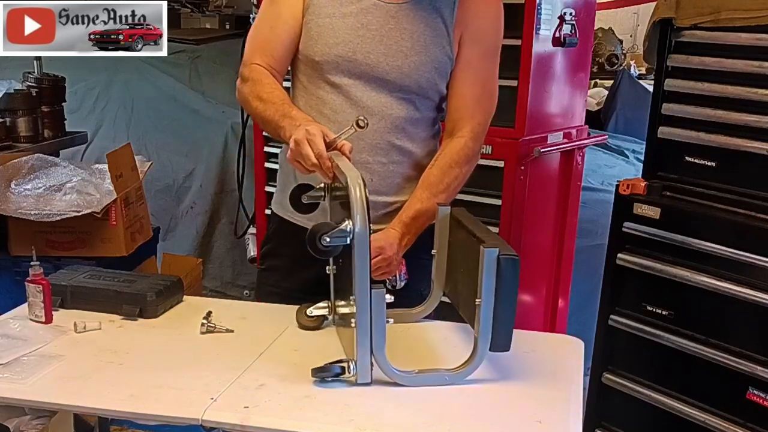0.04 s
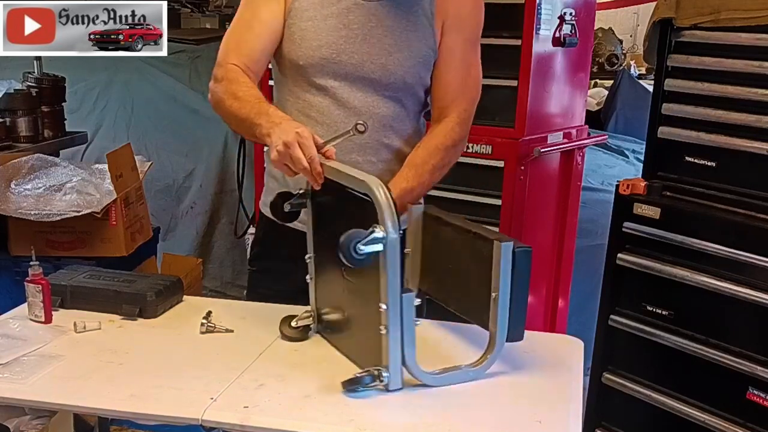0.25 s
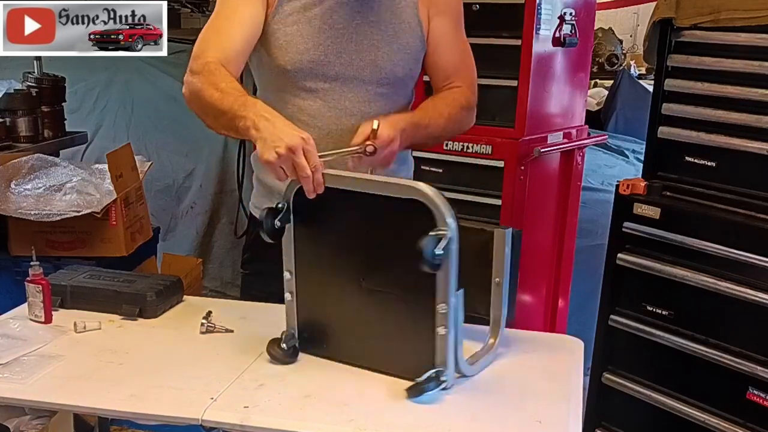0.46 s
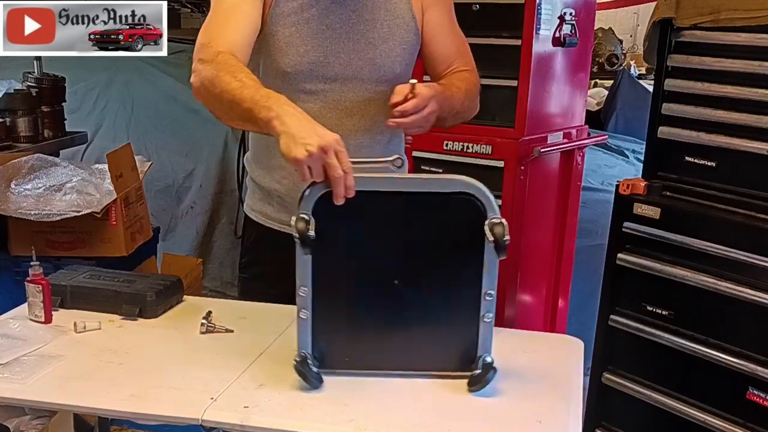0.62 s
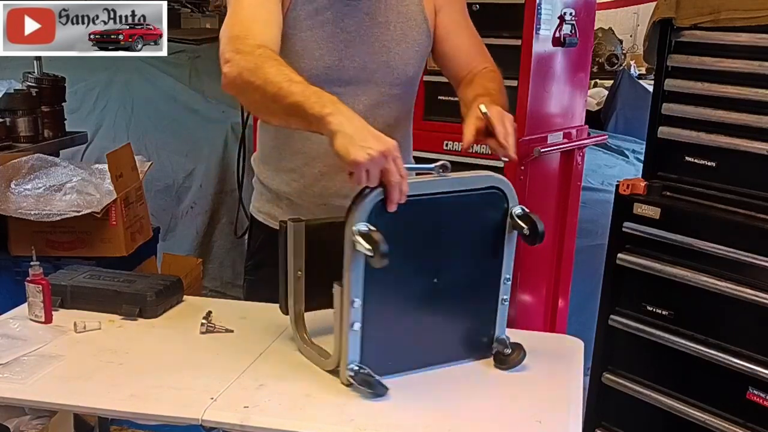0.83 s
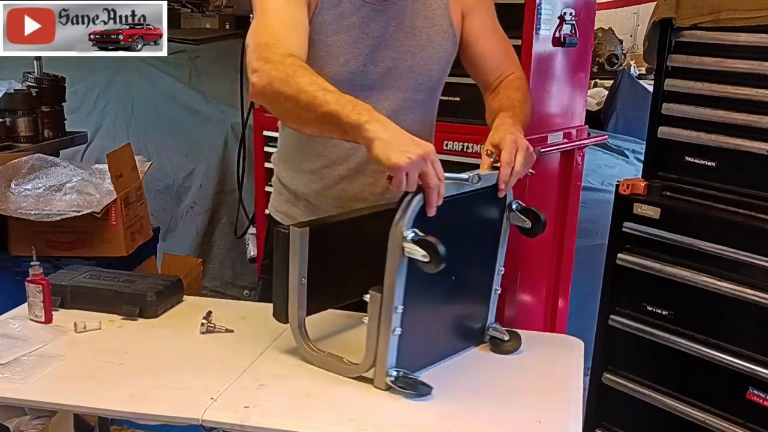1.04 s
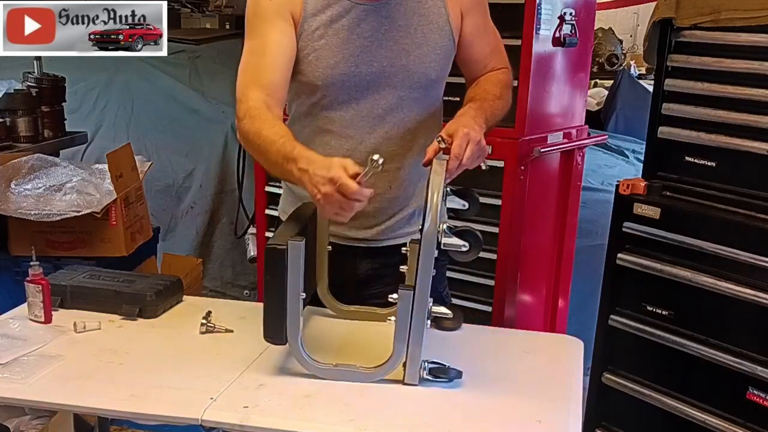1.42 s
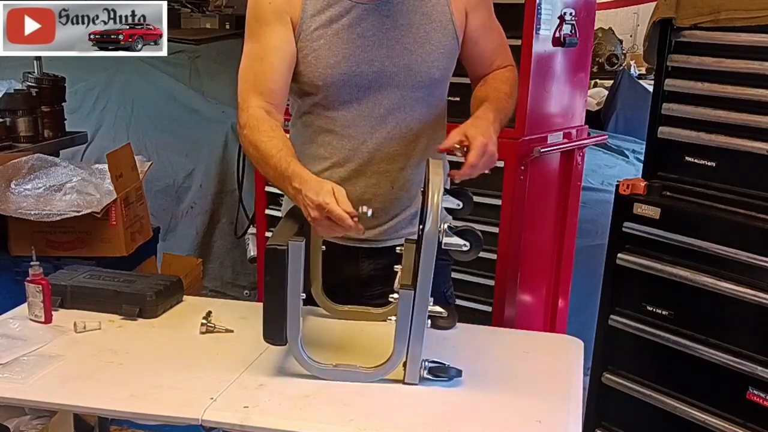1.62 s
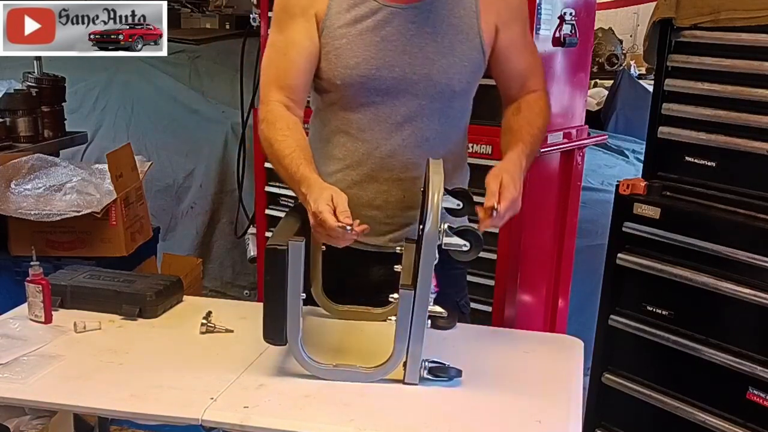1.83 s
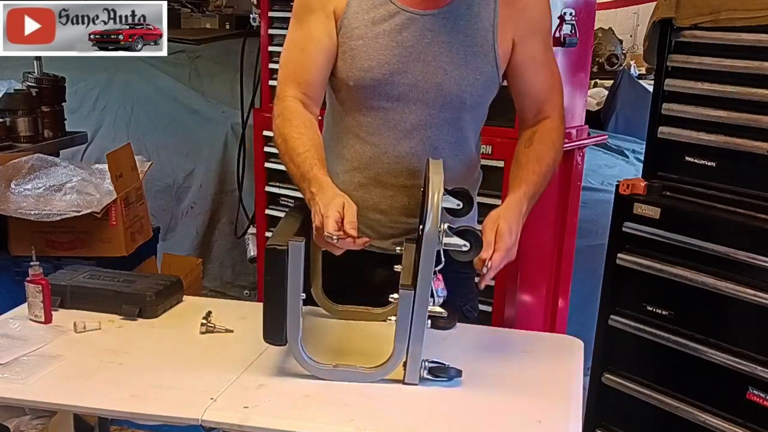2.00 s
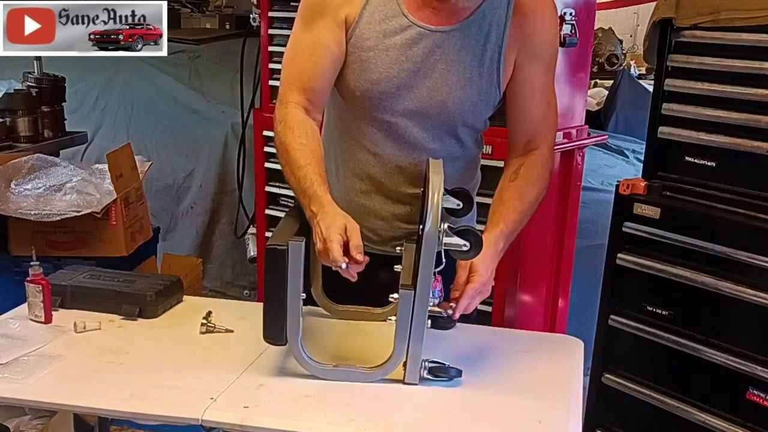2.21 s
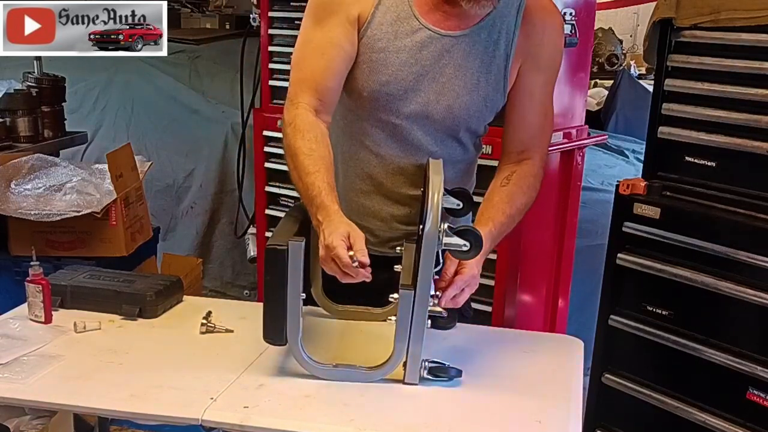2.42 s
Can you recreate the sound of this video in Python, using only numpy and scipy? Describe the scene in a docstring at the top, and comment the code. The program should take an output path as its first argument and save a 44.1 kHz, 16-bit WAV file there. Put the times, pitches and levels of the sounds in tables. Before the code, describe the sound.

A steel stool scrapes round on a workbench in a quiet garage, groaning and squealing as it sticks and slips. It bumps, knocks once and a wrench clinks against it. Light ticks and a small metal click follow.

```python
"""A steel-framed stool lying on its side is dragged round on a workbench in a quiet garage.
The frame sticks and slips, so its tubes and panels drone, groan and squeal while grit rasps under it.
It bumps down and knocks once, and a wrench in the hand clinks on the tube.
After the turn come light ticks, a faint squeak and a last metal click."""
import sys
import numpy as np
from scipy import signal
from scipy.fft import rfft, irfft
from scipy.io import wavfile
from scipy.ndimage import uniform_filter1d

SR = 44100
rng = np.random.default_rng(int(sys.argv[2]) if len(sys.argv) > 2 else 0)


def unload_audio(sound):
    """Save the sound as a 16-bit wav file, at the path given as the first command line argument."""
    columns = np.transpose(np.atleast_2d(sound))
    # keep every value between -1 and 1, then stretch to whole-number steps
    steps = np.round(np.clip(columns, -1, 1) * 32767)
    wavfile.write(sys.argv[1], SR, steps.astype(np.int16))


N = 112454
TIME = np.arange(N) / SR

# Levels in all tables are relative. A fade_s is the time a sound takes to fall by 60 dB.
# Notes the steel tubes ring with: pitch_hz, level_db, fade_s
TUBE_NOTES = [(2476, 6.5, 0.33), (2930, 12.5, 0.038), (3206, -1.5, 0.051), (3180, 0, 0.058),
              (4170, -14.5, .25)]
# Notes the frame rings with when knocked: pitch_hz, level_db, fade_s
KNOCK_NOTES = [(1033, -11, .05), (1338, 4.5, 0.038), (1640, -9, 0.06), (1846, -4, 0.17), (2190, 0, .08),
               (2815, -4, .08), (3670, -5.5, 0.094)]
# Tone of the frame rasping or clacking on the bench: pitch_hz, level_db
RASP_TONE = [(200, -22.5), (500, 1.5), (700, 1), (900, -0.5), (1700, 0), (2200, 0.5), (2600, -5),
             (3500, -33)]


def from_db(db):
    """Turn decibels into a gain."""
    return 10 ** (np.asarray(db) / 20)


def level_one(x):
    """Scale a sound to an average (RMS) level of one."""
    return x / np.sqrt(np.mean(x ** 2) + 1e-20)


def steady(x, span_s=0.037):
    """Hold the running level at one, keeping the fine grain."""
    power = uniform_filter1d(np.mean(x ** 2, axis=0), int(span_s * SR))
    return x / np.sqrt(np.abs(power) + 1e-12)


def gains(rows):
    """Turn each level column of a table into a gain for every sample."""
    time_s, *columns = np.transpose(rows)
    return [from_db(np.interp(TIME, time_s, level_db)) for level_db in columns]


def fade(t, fade_s):
    """Die away by 60 dB every fade_s seconds."""
    return np.exp(-np.log(1000) * t / fade_s)


def convolve(x, response):
    """Let every sample of x set off its own copy of the response."""
    return signal.fftconvolve(np.atleast_2d(x), np.atleast_2d(response), axes=1)[:, :N]


def shape_tone(x, tone, amount=1):
    """Filter a sound to follow a table of pitch_hz, level_db; amount scales the decibels."""
    size = 8192
    pitch_hz, level_db = np.transpose(tone)
    grid_hz = np.maximum(np.fft.rfftfreq(size, 1 / SR), 1)
    curve_db = amount * np.interp(np.log(grid_hz), np.log(pitch_hz), level_db)
    cepstrum = irfft(np.log(from_db(curve_db)))
    # Fold it in half so the filter never sounds before its input.
    cepstrum[1:size // 2] *= 2
    cepstrum[size // 2 + 1:] = 0
    return convolve(x, irfft(np.exp(rfft(cepstrum))))


def ringing(notes):
    """A struck body rings as fading sine waves, here with alternating signs."""
    t = TIME[:SR // 2]
    return sum((-1) ** k * from_db(level_db) * fade(t, fade_s) * np.sin(2 * np.pi * pitch_hz * t)
               for k, (pitch_hz, level_db, fade_s) in enumerate(notes))


def garage(x, wet_db):
    """Add a short echo at wet_db, alike on both sides in the bass and dying sooner in the treble."""
    wide_above_hz, treble_hz, build_s = 704, 4000, 0.0033
    t = TIME[:SR // 2]
    mid, side = rng.standard_normal((2, len(t)))
    side = signal.sosfilt(signal.butter(1, wide_above_hz, "high", fs=SR, output="sos"), side)
    echo = np.array([mid + side, mid - side]) * (1 - np.exp(-t / build_s))
    low = signal.sosfilt(signal.butter(2, treble_hz, fs=SR, output="sos"), echo)
    echo = low * fade(t, fade_s=0.29) + (echo - low) * fade(t, fade_s=0.22)
    return x + from_db(wet_db) * convolve(x, level_one(echo) / np.sqrt(len(t)))


def blows(rows):
    """One sharp push for each row of start_s, level_db."""
    out = np.zeros(N)
    for start_s, level_db in rows:
        out[int(start_s * SR)] += from_db(level_db)
    return out


def unit_hit(x):
    """Scale a hit to the energy of ten milliseconds at level one."""
    return x * np.sqrt(.01 * SR / np.sum(x ** 2))


def crack(tone, fade_s, snap_db):
    """A sharp snap of contact, then a quickly dying burst of noise."""
    t = TIME[:SR // 4]
    burst = rng.standard_normal(len(t)) * fade(t, fade_s)
    burst[0] = from_db(snap_db) * np.linalg.norm(burst)
    return unit_hit(shape_tone(burst, tone))


def strike(rows, tone, notes, crack_s, snap_db, ring_db, wet_db, pan_db):
    """Each contact cracks and sets a body ringing in the room; positive pan_db leans left."""
    hits = blows(rows)
    cracks = convolve(hits, crack(tone, crack_s, snap_db))
    ring = from_db(ring_db) * convolve(hits, unit_hit(ringing(notes)))
    return garage(cracks + ring, wet_db) * from_db([[pan_db / 2], [-pan_db / 2]])


def slips(per_s, spread_db):
    """Random little jerks of uneven size."""
    size = from_db(spread_db * np.minimum(rng.exponential(1, N), 4)) * rng.choice([-1, 1], N)
    return size * (rng.random(N) < per_s / SR)


def rubbing_tone(path, bands, wander, wet_db):
    """Friction drives narrow bands of noise that waver around a path of pitch and level."""
    waver_hz = 32
    time_s, pitch_hz, level_db = np.transpose(path)
    slow = signal.butter(2, waver_hz, fs=SR, output="sos")
    out = 0
    for multiple, band_db, width_hz in bands:
        waver = level_one(signal.sosfilt(slow, rng.standard_normal(N)))
        centre_hz = multiple * np.interp(TIME, time_s, pitch_hz) * (1 + wander * waver)
        carrier = np.exp(2j * np.pi * np.cumsum(centre_hz) / SR)
        narrow = signal.butter(2, width_hz / 2, fs=SR, output="sos")
        # Keep only the noise close to the moving pitch.
        band = np.real(carrier * signal.sosfilt(narrow, rng.standard_normal(N) / carrier))
        out = out + from_db(band_db) * level_one(band)
    return from_db(np.interp(TIME, time_s, level_db)) * steady(garage(out, wet_db), span_s=0.18)


def background():
    """The quiet garage: a low rumble with a faint hiss."""
    # Tone of the room's noise: pitch_hz, level_db
    tone = [(15, -33), (25, -8.5), (64, 5.5), (125, -11.5), (300, -16.5), (796, -25.5), (1520, -24),
            (5000, -30), (9840, -22), (13200, -17.5), (16000, -23.5)]
    noise = garage(rng.standard_normal(N), wet_db=7.5)
    return from_db(-68.5) * level_one(shape_tone(noise, tone))


def light_ticks():
    """Light contacts after the turn barely ring the tubes."""
    # The contacts: start_s, level_db
    hits = [(1.886, -76.5), (2.0172, -57.5), (2.072, -69.5), (2.188, -76)]
    # Tone of their crack: pitch_hz, level_db
    tone = [(200, -14), (1000, -11), (2400, 2.5), (3300, -10), (6000, -16), (12000, -18.5), (16000, -17)]
    return strike(hits, tone, TUBE_NOTES, crack_s=.012, snap_db=0, ring_db=-24, wet_db=3.5, pan_db=2.5)


def metal_squeak():
    """Sliding metal squeaks faintly before the last click."""
    # Course of the squeak: time_s, pitch_hz, level_db
    path = [(2.0, 6440, -100), (2.1, 6484, -73.5), (2.24, 6760, -75.5), (2.41, 6440, -77),
            (2.45, 6317, -100)]
    # Bands that follow it: pitch_multiple, level_db, width_hz
    bands = [(1.0, -0.5, 450), (1.21, -0.5, 399.5), (1.6, -2, 2510)]
    return rubbing_tone(path, bands, wander=.015, wet_db=-3)


def last_click():
    """Three quick metal contacts make one bright click."""
    # The contacts: start_s, level_db
    hits = [(2.431, -36), (2.4365, -42), (2.452, -44.5)]
    # Tone of their crack: pitch_hz, level_db
    tone = [(200, -17.5), (600, -9.5), (1000, 2.5), (2500, 0), (3400, -3.5), (4600, 1.5), (7300, -2.5),
            (8300, -8), (12500, -9), (16000, -16)]
    # Notes the metal rings with: pitch_hz, level_db, fade_s
    notes = [(1090, -17, 0.1), (2550, -17, 0.08), (2880, 2, 0.13), (4200, 0.5, 0.055), (5800, -5, 0.04),
             (7290, 9, 0.021), (8870, 3.5, 0.037), (12900, -12, .08)]
    return strike(hits, tone, notes, crack_s=.089, snap_db=-18, ring_db=-2.5, wet_db=-5.5, pan_db=0.5)


def wrench_clink():
    """The wrench hits the tube and rings high."""
    # The contacts: start_s, level_db
    hits = [(.6962, -19.5), (.7003, -23.5), (.7028, -26)]
    # Tone of their crack: pitch_hz, level_db
    tone = [(300, -26), (2200, -12.5), (3000, -0.5), (3700, -9), (5000, -11.5), (7400, -14.5), (8200, -0.5),
            (9000, 1.5), (9700, -17.5), (13000, -22.5), (16000, -31)]
    # Notes the wrench rings with: pitch_hz, level_db, fade_s
    notes = [(2935, 9.5, .14), (4180, 8, 0.22), (5600, -9, .07), (8090, 0, .09), (8764, -2, 0.1),
             (9050, -2, .08)]
    return strike(hits, tone, notes, crack_s=.018, snap_db=-5.5, ring_db=-3.5, wet_db=-12.5, pan_db=0.5)


def frame_knock():
    """Three hard contacts come so close together that they sound as one knock."""
    # The contacts: start_s, level_db
    hits = [(.4143, -13), (.4178, -18.5), (.4215, -20)]
    # Tone of their crack: pitch_hz, level_db
    tone = [(100, -19.5), (400, -14), (750, -11.5), (1100, 8.5), (1800, 5), (3000, -2), (4700, -3.5),
            (6500, -16), (9000, -22.5), (16000, -27)]
    return strike(hits, tone, KNOCK_NOTES, crack_s=.025, snap_db=-3, ring_db=-6.5,
                  wet_db=-6.5, pan_db=-0.5)


def frame_bumps():
    """The frame drops on the bench with low thuds and dull clacks."""
    # The landings: start_s, thud_db, clack_db
    landings = [(.230, -50, -33), (0.235, -25.5, -26.5), (0.246, -21, -34), (0.285, -26, -38),
                (0.881, -33, -48.5)]
    # Tone of a thud: pitch_hz, level_db
    thud_tone = [(30, -16), (90, -0.5), (300, 13), (500, -12.5), (900, -20), (3000, -57)]
    thud_hits = [(start_s, thud_db) for start_s, thud_db, _ in landings]
    clack_hits = [(start_s, clack_db) for start_s, _, clack_db in landings]
    thuds = convolve(blows(thud_hits), crack(thud_tone, fade_s=.018, snap_db=-4))
    clacks = strike(clack_hits, RASP_TONE, KNOCK_NOTES, crack_s=.017, snap_db=-8, ring_db=-9.5,
                    wet_db=-2.5, pan_db=1.5)
    return thuds + clacks


def frame_groan():
    """The rubbing frame groans, sinking in pitch as the turn slows."""
    # Course of the groan: time_s, pitch_hz, level_db
    path = [(.72, 445, -88), (.815, 483, -30), (.875, 387, -36.5), (.94, 388, -34.5), (.96, 293, -42),
            (1.01, 278, -29), (1.1, 241.5, -42), (1.15, 259, -42), (1.26, 208.3, -40.5),
            (1.48, 207.4, -50.5), (1.66, 210, -100)]
    # Bands that follow it: pitch_multiple, level_db, width_hz
    bands = [(1.0, -5, 40), (2.0, -15, 90)]
    return rubbing_tone(path, bands, wander=.03, wet_db=-6)


def frame_squeal():
    """Friction makes the sliding frame squeal at a high, restless pitch."""
    # Course of the squeal: time_s, pitch_hz, level_db
    path = [(0, 2900, -52), (.13, 2900, -79), (.245, 2500, -33), (.285, 2750, -32.5), (.3, 2200, -35.5),
            (.335, 2130, -36.5), (.37, 2100, -48), (.5, 2150, -36), (.6, 2450, -43.5), (.645, 2580, -36),
            (.69, 3050, -32), (.79, 2800, -40), (.84, 3280, -32), (.91, 3000, -37.5), (.95, 2700, -46),
            (.99, 3100, -41), (1.07, 2750, -42), (1.135, 3300, -38.5), (1.155, 3050, -54),
            (1.195, 3350, -42.5), (1.28, 2800, -46), (1.36, 2900, -43), (1.415, 2450, -60.5),
            (1.49, 2842, -58), (1.6, 2950, -97.5)]
    # Bands that follow it: pitch_multiple, level_db, width_hz
    bands = [(1.0, -1.5, 190), (.82, -8.5, 190), (1.5, -14, 400)]
    return rubbing_tone(path, bands, wander=.015, wet_db=-0.5)


def grit_scrape():
    """Fine grit under the frame rasps, rings the tubes and hisses."""
    # Strength of the rasp and the tubes' ring: time_s, rasp_db, ring_db
    rasp_levels = [(0.0, -53, -65.5), (0.126, -84.5, -80), (0.238, -28.5, -32), (0.26, -44, -43.5),
                   (0.4, -35.5, -40), (0.508, -32, -34.5), (0.59, -41.5, -45), (0.73, -37.5, -30),
                   (0.776, -31.5, -41), (0.842, -36, -35.5), (0.92, -37, -42.5), (1.2, -42, -42),
                   (1.28, -37.5, -44.5), (1.37, -42.5, -45.5), (1.42, -50.5, -58), (1.6, -81, -87),
                   (1.69, -75.5, -88), (1.78, -88, -104)]
    # Strength of the sliding hiss: time_s, level_db
    hiss_levels = [(0, -54), (.1, -80.5), (.24, -43.5), (.33, -53), (.38, -46.5), (.68, -46.5), (1.0, -50),
                   (1.21, -56.5), (1.25, -36), (1.29, -41), (1.32, -68), (1.35, -38.5), (1.39, -50),
                   (1.42, -58.5), (1.58, -73.5), (1.66, -68), (1.76, -83.5), (2.0, -76.5), (2.18, -70.5),
                   (2.3, -83)]
    # Tone of the bright scratch that goes with the ring: pitch_hz, level_db
    scratch_tone = [(1500, -19), (2400, -7.5), (3000, 5), (3700, 2), (4800, -2), (6000, -11.5), (8000, -26)]
    # Tone of the hiss: pitch_hz, level_db
    hiss_tone = [(2000, -12.5), (4500, 6), (6000, 3.5), (8500, -5), (12500, -5.5), (16000, -21)]
    rasp_gain, ring_gain = gains(rasp_levels)
    hiss_gain, = gains(hiss_levels)
    grit = garage(slips(per_s=3200, spread_db=2.5), wet_db=2.5)
    rasp = steady(shape_tone(grit, RASP_TONE))
    tubes = from_db(-8) * steady(convolve(grit, ringing(TUBE_NOTES)))
    scratch = from_db(-0.5) * steady(shape_tone(grit, scratch_tone))
    hiss = from_db(-2.5) * steady(shape_tone(grit, hiss_tone))
    return rasp_gain * rasp + ring_gain * (tubes + scratch) + hiss_gain * hiss


def stick_and_slip():
    """The dragged stool sticks and slips; the jerks make the bench boom and the frame drone."""
    # Strength of the shaking: time_s, boom_db, drone_db
    shake_levels = [(0.0, -45, -48.5), (0.14, -77, -72), (0.246, -24.5, -23.5), (0.278, -23, -33),
                    (0.382, -37, -29.5), (0.544, -40.5, -35.5), (0.606, -46, -45.5), (0.666, -31.5, -35.5),
                    (0.71, -45.5, -30), (0.77, -30.5, -38.5), (0.83, -36, -34), (0.88, -41, -26),
                    (0.918, -37.5, -32), (1.026, -39, -34), (1.14, -46, -39.5), (1.39, -47, -39.5),
                    (1.7, -81.5, -88.5)]
    # Notes of the bench top: pitch_hz, level_db, fade_s
    bench_notes = [(70, -15.5, 0.02), (90.6, -8, 0.18), (123.84, -5.5, 0.22), (141.46, -1.5, 0.17)]
    # Low notes of the frame: pitch_hz, level_db, fade_s
    frame_notes = [(210.8, -3, 0.22), (241.4, -1, 0.14), (266.6, -2, .2), (295.5, -4, 0.28), (384, -1, .17),
                   (426.8, -8.5, 0.26), (459.3, -2.5, 0.2), (533, -3, .12), (603, -8.5, 0.45),
                   (652, -3.5, 0.09)]
    boom_gain, drone_gain = gains(shake_levels)
    jerks = slips(per_s=240, spread_db=1)
    boom = from_db(-4.5) * steady(convolve(jerks, ringing(bench_notes)))
    drone = from_db(-0.5) * steady(garage(convolve(jerks, ringing(frame_notes)), wet_db=-6))
    return boom_gain * boom + drone_gain * drone


def scene():
    """Mix the stool's sounds, bass to the right and treble to the left, over the background."""
    # Lean to the left, of which each side takes a share: pitch_hz, lean_db
    lean = [(100, -4.5), (400, -2.5), (700, -3), (1300, 1), (2400, 0.5), (4400, 6), (8500, 10.5),
            (12500, 9)]
    contacts = frame_knock() + wrench_clink() + light_ticks() + last_click()
    sliding = stick_and_slip() + grit_scrape() + frame_squeal() + frame_groan() + metal_squeak()
    left, right = contacts + sliding + frame_bumps()
    stool = np.vstack([shape_tone(left, lean, amount=0.45), shape_tone(right, lean, amount=-0.37)])
    return stool + background()


def record(dry):
    """Stop peaks at full scale and cut the highest treble."""
    cutoff_hz = 16000
    return signal.sosfilt(signal.ellip(10, .1, 80, cutoff_hz, fs=SR, output="sos"), np.clip(dry, -1, 1))


dry = scene()
out = record(dry)
unload_audio(out)
```